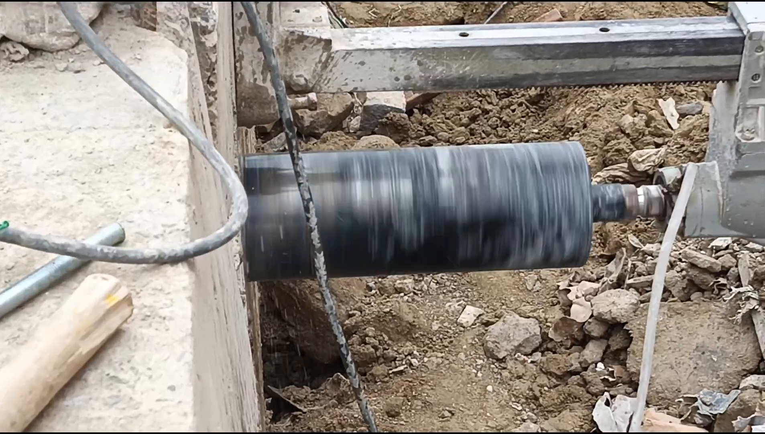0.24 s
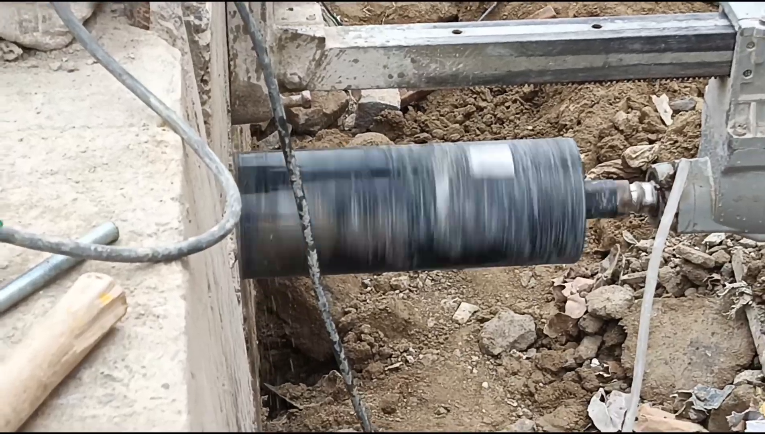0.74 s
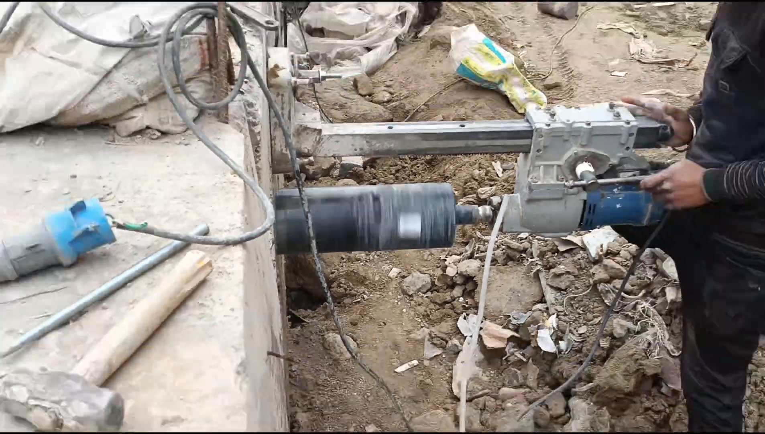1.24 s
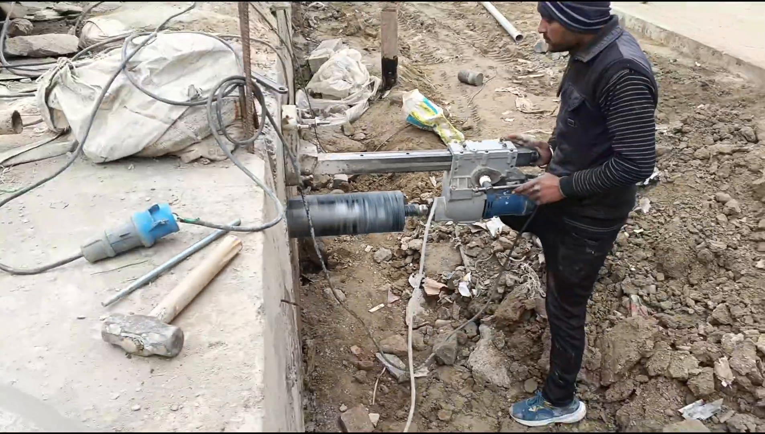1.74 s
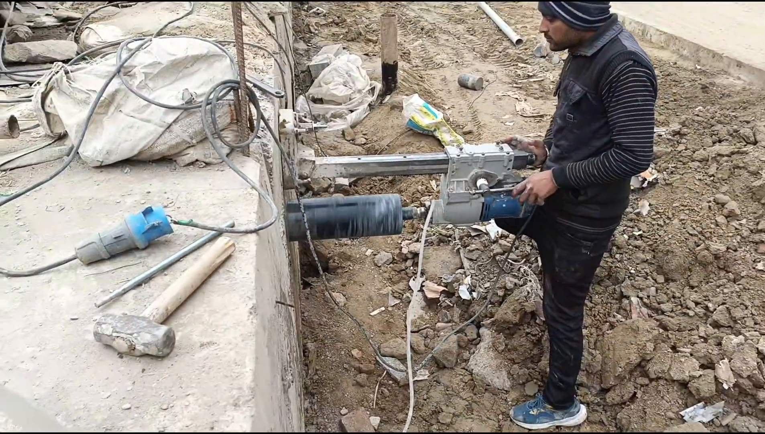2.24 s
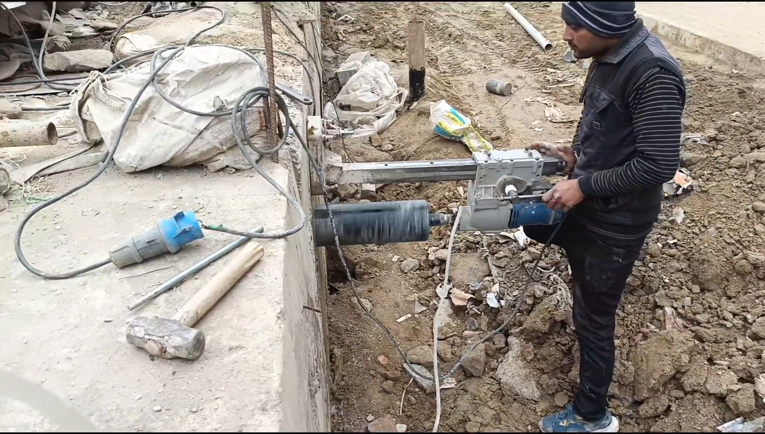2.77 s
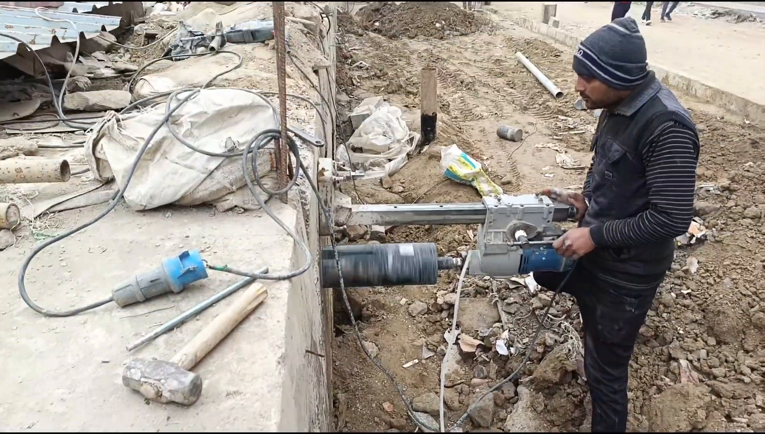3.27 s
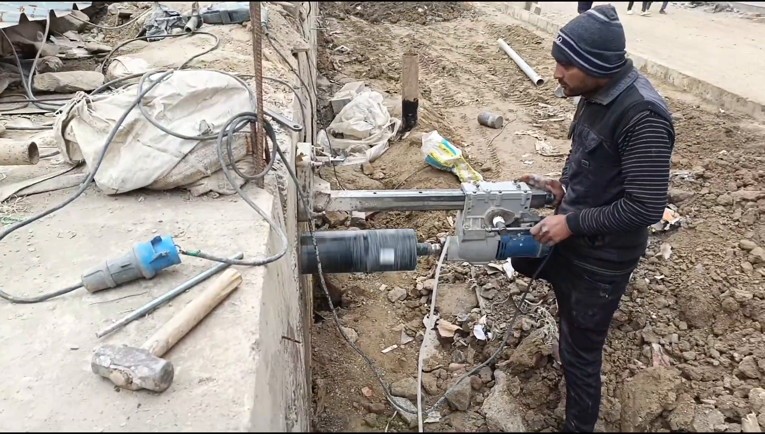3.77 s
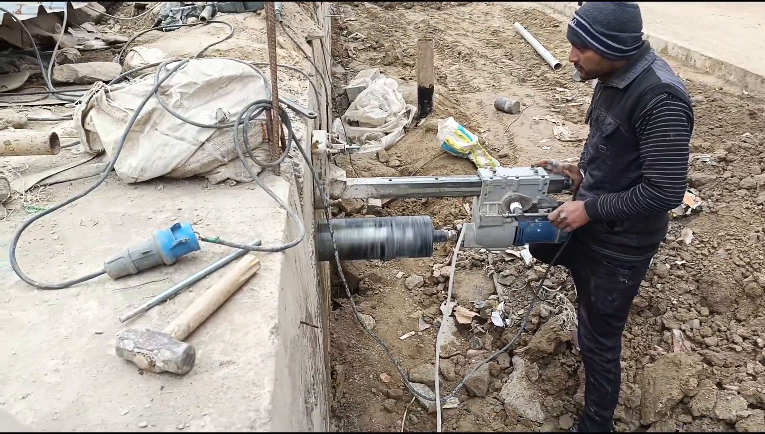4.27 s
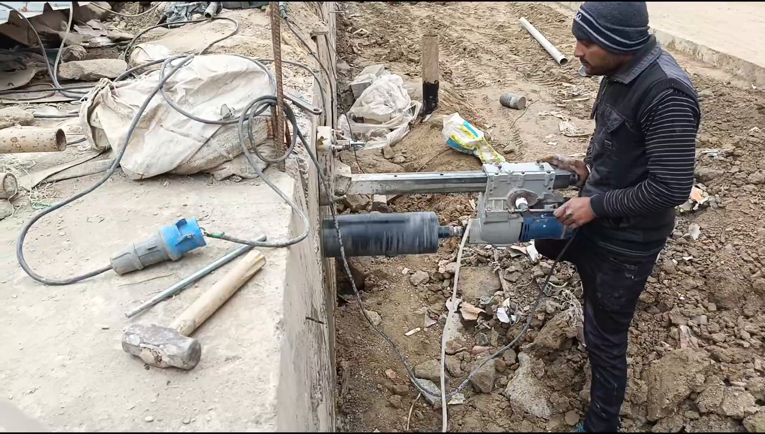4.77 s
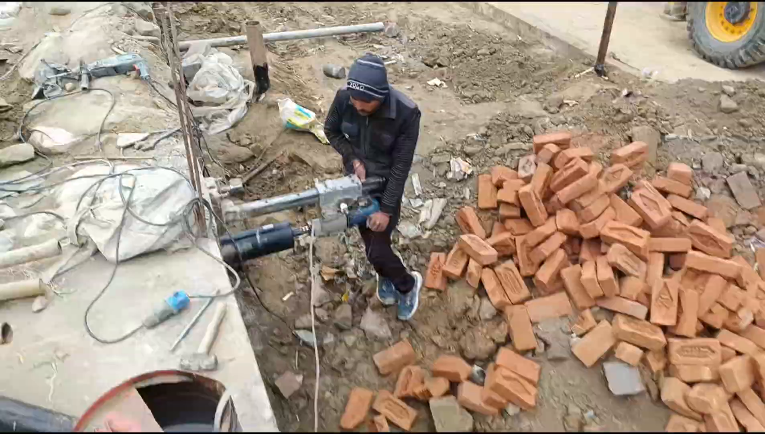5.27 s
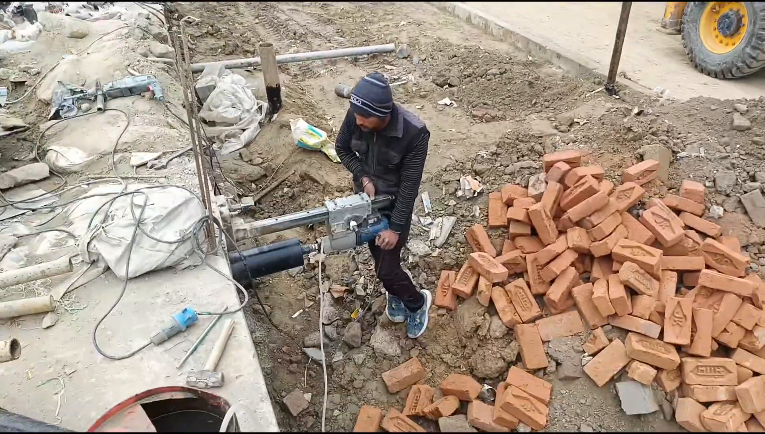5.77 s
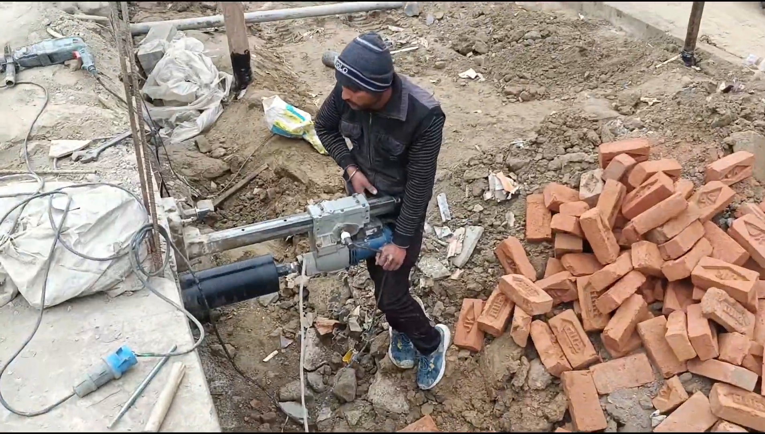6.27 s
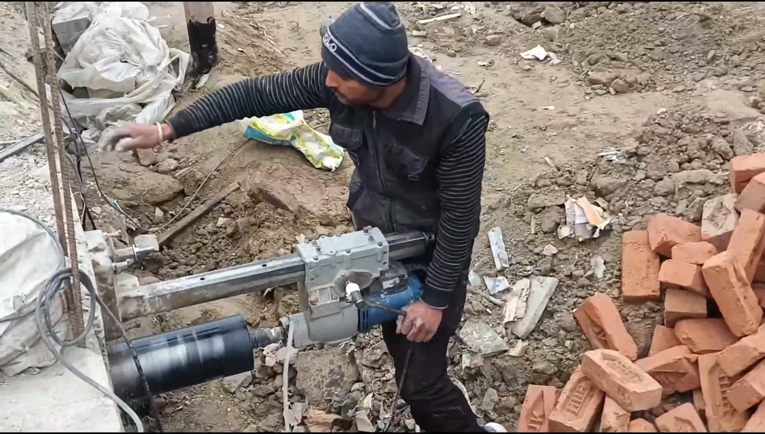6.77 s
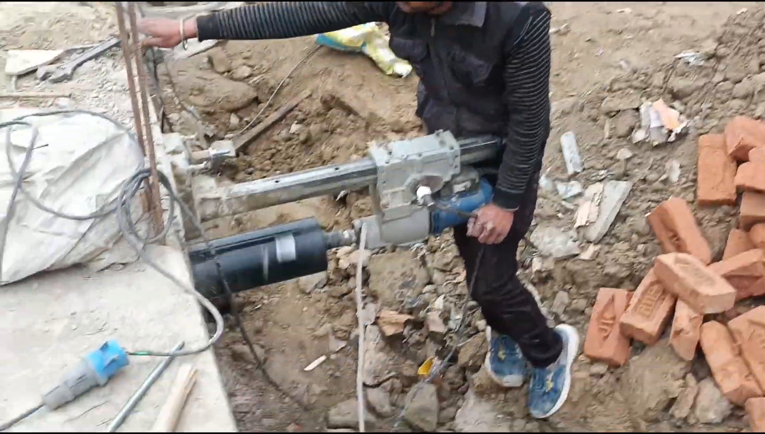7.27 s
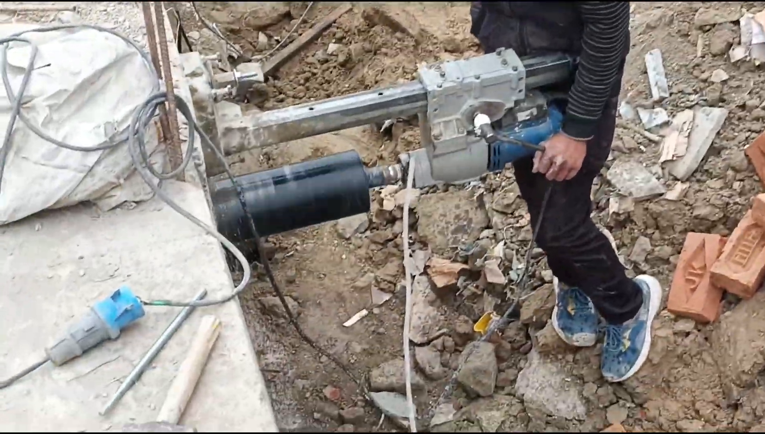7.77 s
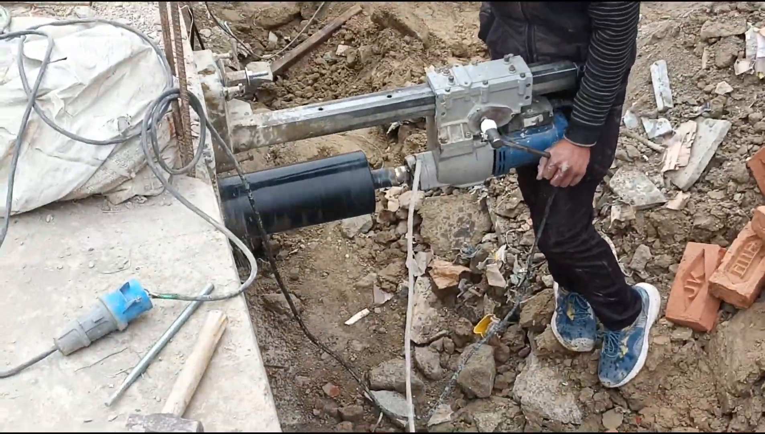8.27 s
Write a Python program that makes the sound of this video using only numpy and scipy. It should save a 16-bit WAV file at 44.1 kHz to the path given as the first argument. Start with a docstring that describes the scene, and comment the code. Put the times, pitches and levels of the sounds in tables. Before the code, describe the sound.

A core drill cuts concrete outdoors, hissing, whining and knocking, then after a brief gap labours lower beside a revving diesel engine.

```python
"""An electric core drill grinds into a concrete wall outdoors. Diamond grit makes its steel barrel
ring, the barrel knocks as it catches in the cut, and the gears whine.
The drill is heard at the wall, then from the side. After a short silence it fades in from above,
running slower under more load, while a diesel engine revs nearby."""
import sys
import numpy as np
from scipy import signal
from scipy.fft import rfft, irfft, next_fast_len
from scipy.io import wavfile

SR = 44100
rng = np.random.default_rng(int(sys.argv[2]) if len(sys.argv) > 2 else 0)


def master_out(mix):
    """Clip the mix to full scale and print it as 16-bit PCM to the path in sys.argv[1]."""
    frames = np.transpose(np.atleast_2d(mix))
    ceiling = np.clip(frames, -1, 1)
    pcm = np.round(ceiling * 32767).astype(np.int16)
    wavfile.write(sys.argv[1], SR, pcm)


N = 376160
TIME = np.arange(N) / SR
FFT_SIZE = next_fast_len(N, True)
BIN_HZ = np.maximum(np.arange(FFT_SIZE // 2 + 1) * SR / FFT_SIZE, 1)
SILENCE_FROM_S, SILENCE_TO_S = 5.272, 5.335
HEAVY_LOAD = TIME > SILENCE_FROM_S


def from_db(db):
    """Turn decibels into a number to multiply by."""
    return 10 ** (np.asarray(db) / 20)


def rms(x):
    """The average strength of a signal (root mean square)."""
    return np.sqrt(np.mean(x ** 2) + 1e-20)


def curves(rows):
    """Join timed points with straight lines, one curve for each column after the time."""
    times_s, *columns = np.transpose(rows)
    return [np.interp(TIME, times_s, column) for column in columns]


def bell(peak_s, width_s):
    """A smooth bump of height 1, down to 0.61 at width_s either side of its peak."""
    return np.exp(-((TIME - peak_s) / width_s) ** 2 / 2)


def swells(rows):
    """Add up smooth rises and dips, in decibels."""
    return sum(db * bell(peak_s, width_s) for peak_s, width_s, db in rows)


def butter(x, hz, kind, order=4):
    """Keep the lows, the highs or one band of a sound."""
    return signal.sosfilt(signal.butter(order, hz, kind, fs=SR, output="sos"), x)


def drift(changes_per_s):
    """A smooth random wobble with a typical size of 1."""
    step, warm_up = 40, 2000
    pole = np.exp(-2 * np.pi * step * changes_per_s / SR)
    noise = rng.standard_normal(N // step + warm_up + 2)
    slow = signal.lfilter([1], [1, -2 * pole, pole * pole], noise)[warm_up:]
    return np.interp(np.arange(N) / step, np.arange(len(slow)), slow / rms(slow))


def angle_of(hz):
    """How far something has turned when it spins hz times a second."""
    return 2 * np.pi * np.cumsum(hz) / SR


# How the engine revs. Columns: time_s, pitch_hz, level_db
ENGINE_REVS = [(5.38, 31.9, -37), (5.45, 33, -29), (5.88, 40.6, -28), (6.27, 41.7, -31.5),
               (6.47, 39.7, -30.5), (6.6, 35.1, -38), (6.68, 37.47, -22.5), (6.99, 44, -26.5),
               (7.34, 46.2, -23), (8.5, 46.2, -37.5)]
# The pitches its exhaust favours or holds back. Columns: pitch_hz, gain_db
EXHAUST_TONE = [(46, -21.5), (64, -8), (73, 8), (82, -9.5), (93, 3.5), (112, 5), (123, -12), (141, -6.5),
                (163, -0.5), (185, -9.5), (280, -18)]

def diesel(harmonics=6, uneven_db=1.5, roughness=0.21, trim_db=-1.0):
    """An engine revs, sags and revs again, firing unevenly; its exhaust boosts some of its harmonics."""
    pitch_hz, level_db = curves(ENGINE_REVS)
    angle = angle_of(pitch_hz * (1 + 0.0032 * drift(5.9)))
    exhaust_hz, exhaust_db = np.transpose(EXHAUST_TONE)
    multiples = np.arange(1, harmonics + 1)
    gains = from_db(np.interp(np.log(np.outer(multiples, pitch_hz)), np.log(exhaust_hz), exhaust_db))
    gains /= np.linalg.norm(gains, axis=0)
    hum = np.zeros(N)
    for multiple, gain in zip(multiples, gains):
        uneven = from_db(uneven_db * drift(7.5))
        hum += gain * uneven * np.sin(multiple * angle + rng.uniform(0, 2 * np.pi))
    return np.sqrt(2) * from_db(level_db + trim_db) * hum * (1 + roughness * drift(25))


# The tone of the meshing gear teeth swells. Columns: peak_s, width_s, change_db
MESH_SWELLS = [(6.1, 0.068, 6), (8.02, 0.083, 8)]
# The high whine dips briefly, and once rises. Columns: peak_s, width_s, change_db
WHINE_CHANGES = [(0.17, .13, -20), (0.95, .12, 3), (1.8, .14, -9), (2.2, 0.057, -13), (2.47, .04, -9),
                 (3.38, .15, -11), (3.75, .05, -15), (4.35, .1, -5), (5.9, 0.35, -22), (8.45, .2, -12)]

def gears(mesh_hz, mesh_db, whine_db, rattle=0.35, housing_hz=997.4, housing_width_hz=57):
    """Gear teeth sing as they meet, roughened by the slack between them, with a thin whine far above."""
    drag = np.where(HEAVY_LOAD, 0.0018, 0.00039) * drift(9.4)  # the speed wavers as the bit drags
    jitter = 0.00056 * drift(60)
    angle = angle_of(mesh_hz * (1 + drag + jitter))
    mesh = (1 + rattle * drift(22)) * np.sin(angle) + rattle * drift(22) * np.cos(angle)
    # Under heavy load the tone is loudest at the pitch where the gear housing rings.
    housing = 1 / (1 + (2 * (mesh_hz - housing_hz) / housing_width_hz) ** 2)
    mesh *= np.where(HEAVY_LOAD, housing, 1) * from_db(mesh_db + swells(MESH_SWELLS))
    flutter_db = 1.5 * drift(120) + 2.0 * drift(9.4)
    whine = np.sin(11 * angle) * from_db(whine_db + flutter_db + swells(WHINE_CHANGES))
    return np.sqrt(2) * (mesh + whine)


def grit(grains_per_s):
    """Diamond grains chip the concrete in a dense hail of tiny hits."""
    return (rng.random(N) < grains_per_s / SR) * rng.standard_normal(N)


def resonate(x, pitch_hz, width_hz, boost_db):
    """Pass a sound through resonances; each boosts one narrow band, or cuts it if negative."""
    pole = np.exp(-np.pi * width_hz / SR)
    tuning = -2 * pole * np.cos(2 * np.pi * pitch_hz / SR)
    boost = (from_db(boost_db) - 1) * (1 - pole ** 2) / 2
    filters = [1 + boost, tuning, pole ** 2 - boost, np.ones_like(pole), tuning, pole ** 2]
    return signal.sosfilt(np.column_stack(filters), x)


# The balance of bass and treble at each listening place. Columns: pitch_hz, wall_db, side_db, above_db
TONE_BALANCE = [(50, -77, -79, -70), (100, -67, -80, -59), (187, -69, -71, -52), (299, -71, -79, -60.5),
                (710, -62, -64.5, -62), (1540, -56.5, -55, -56), (3480, -57.5, -57.5, -56),
                (3900, -53, -63, -58.5), (6310, -51, -48, -53), (7245, -58.5, -60.5, -61),
                (8040, -76, -83.5, -70.5), (11150, -83.5, -87.5, -91), (13500, -78, -94, -85),
                (15400, -67.5, -83, -75)]
# The pitches at which barrel and stand ring, and the boost heard at each place.
# Columns: pitch_hz, width_hz, wall_db, side_db, above_db
RESONANCES = [(200, 45, 14, 16, 0), (242, 45, 2, 1, 6), (400, 70, 12.5, 17, -3), (528, 50, 5, 8, 11),
              (884, 78, 6, 8, 3), (975, 55, 3, 5, 8), (1160, 44, 12, 8, 0), (1403, 33, 6, 7, 0),
              (1655, 42, 10, 6, 4), (1787, 44, 0, 0, 5), (1882, 56, 4, 5, 0), (2035, 118, 7, 2, 4),
              (2208, 64, 0, 1, 5), (2407, 61, 2, 0, 6), (2577, 20, 11, 11.5, 1), (2648, 24, 10, 10, 4),
              (2831, 89, 6, 10, -2), (3400, 400, -1.5, -3.5, 0), (3759, 26, 8, 8, 4), (3848, 15, 10, 11, 2),
              (3969, 260, 0, 12, 9), (4499, 390, 7, 9, 0), (5167, 29, 10, 10, 6), (5268, 23, 7, 8, 6),
              (5525, 179, 9, 7, 2), (5937, 32, 6, 6, 2), (6773, 27, 6, 5, 3), (6889, 21, 11, 11, 5),
              (7178, 17, 7, 0, 0), (9150, 400, 6, 4, 0)]

def barrel_and_stand(force, place):
    """A force rings the barrel and stand, heard at the wall (place 0), the side (1) or above (2)."""
    balance_hz, *balance_db = np.transpose(TONE_BALANCE)
    pitch_hz, width_hz, *boost_db = np.transpose(RESONANCES)
    gain = from_db(np.interp(np.log(BIN_HZ), np.log(balance_hz), balance_db[place]))
    shaped = irfft(rfft(force, FFT_SIZE) * gain, FFT_SIZE)[:N]
    ringing = resonate(shaped, pitch_hz, width_hz, boost_db[place])
    return butter(ringing, 55, "high", order=2)


# Moments when one pitch of the barrel rings out. Columns: peak_s, width_s, pitch_hz, level_db
RIM_RUBS = [(0.38, .18, 1162, -31), (0.51, .08, 5480, -20.5), (1.24, .05, 3830, -25), (1.4, .17, 2610, -29),
            (1.48, .07, 1162, -29), (1.85, .22, 2840, -32.5), (2.15, .15, 2610, -26.5),
            (3.35, .13, 3860, -26), (4.45, .06, 2620, -29), (6.52, .06, 5200, -25.5),
            (6.74, .05, 2640, -29.5), (7.4, .2, 2215, -31.5)]

def rim_rubs(half_band=0.015):
    """Now and then the rim rubs, and the barrel sings in a narrow band around one pitch."""
    sound = np.zeros(N)
    for peak_s, width_s, pitch_hz, level_db in RIM_RUBS:
        band_hz = [pitch_hz * (1 - half_band), pitch_hz * (1 + half_band)]
        ring = butter(grit(grains_per_s=11000), band_hz, "band", order=2)
        sound += from_db(level_db) * bell(peak_s, width_s) * ring / rms(ring)
    return sound


# Moments when the barrel catches in the cut. Columns: peak_s, level_db
CATCHES = [(0.648, -27), (0.931, -25), (1.128, -27.5), (1.578, -30), (1.723, -30.5), (1.8, -28.5),
           (1.95, -28.5), (2.005, -29), (2.196, -25.5), (2.45, -30), (2.654, -27.5), (2.786, -21),
           (3.026, -26), (3.543, -37), (3.698, -25.5), (3.935, -34), (4.02, -31), (4.071, -29),
           (4.196, -30), (4.329, -26), (4.482, -24.5), (4.641, -30), (5.144, -26), (5.264, -26.5)]

def knocks(width_s=0.011, dull_hz=600, scrape_db=-16, body_hz=(150, 600), trim_db=-0.5):
    """Each catch is a short, dull scrape that shakes the stand at its low pitches."""
    bursts = sum(from_db(level_db) * bell(peak_s, width_s) for peak_s, level_db in CATCHES)
    scrape = grit(grains_per_s=12000)
    force = butter(scrape, dull_hz, "low", order=2) + from_db(scrape_db) * scrape
    shake = barrel_and_stand(force, place=1)
    return from_db(trim_db) * bursts * shake / rms(butter(shake, body_hz, "band"))


def drifting_echo(force, echo=0.2, delay_s=0.003, wander_s=0.00021):
    """A faint, very short echo with a drifting delay slowly shifts the colour of the grinding."""
    delay = (delay_s + wander_s * drift(1.21)) * SR
    return force + echo * np.interp(np.arange(N) - delay, np.arange(N), force)


def steel_overtones(force, count=30, width_hz=70):
    """The steel tube also rings faintly at many pitches scattered through the high treble."""
    pitch_hz, boost_db = rng.uniform([7300, 0.5], [10600, 1.5], (count, 2)).T
    return resonate(force, pitch_hz, np.full(count, width_hz), boost_db)


def place_shares(move_from_s=3.01, move_to_s=3.33):
    """How much is heard from each place: first the wall, then the side, then above."""
    above = TIME > SILENCE_FROM_S
    aside = np.clip((TIME - move_from_s) / (move_to_s - move_from_s), 0, 1)
    return np.array([(1 - aside) * ~above, aside * ~above, above])


# The bands that set the strength of growl, low hiss, high hiss and spray. Columns: low_hz, high_hz
LEVEL_BANDS = [(1250, 3300), (3300, 4900), (4900, 7500), (8000, 10800)]

def split_bands(sound, edges_hz=(700, 3300, 4900, 7700), hiss_hz=(3300, 7500)):
    """Split a sound, low to high, into rumble, growl, low hiss, high hiss and spray, and scale each."""
    spectrum = rfft(sound, FFT_SIZE)
    below = [irfft(spectrum / (1 + (BIN_HZ / hz) ** 24), FFT_SIZE)[:N] for hz in edges_hz]
    bands = np.diff([np.zeros(N), *below, sound], axis=0)
    levels = [rms(irfft(spectrum * (BIN_HZ > low_hz) * (BIN_HZ < high_hz), FFT_SIZE))
              for low_hz, high_hz in [hiss_hz, *LEVEL_BANDS]]  # the rumble is scaled by the hiss
    return bands / np.array(levels)[:, None]


# The push on the drill surges or eases. Columns: peak_s, width_s, change_db
PUSHES = [(0.5, 0.13, 1.1), (1.26, 0.096, 0.7), (3.58, 0.065, 2), (4.12, 0.09, 1.6), (5.02, 0.086, 1.5),
          (7.2, 0.2, -1.7), (7.84, 0.051, -0.9), (8.5, 0.088, -1)]
# How hard the bit bites, bringing up rumble, growl and spray. Columns: time_s, bite_db
BITE = [(0.6, -1.5), (1.45, 1), (2.65, 0.4), (2.95, -1), (3.5, -1.5), (4.15, 0.9), (5.6, 0), (6.2, -2.5),
        (6.7, 0.2), (7.35, 1.8), (7.9, -1.5)]
# The strength of the low hiss next to the high hiss. Columns: time_s, low_hiss_db
HISS_BALANCE = [(0, -1), (0.5, -3), (1.9, 0.5), (2.8, -1), (3.55, 2), (4.15, -3), (6.7, -1.9), (8.0, -4)]

def grinding(mesh_hz, hiss_db, growl_db, spray_db, meshes_per_turn=157):
    """Grit rings the barrel; the pressure surges with each push, swings with each turn and judders."""
    bite_db, = curves(BITE)
    low_gain = from_db(curves(HISS_BALANCE)[0])
    force = steel_overtones(drifting_echo(grit(grains_per_s=36000)))
    rumble, growl, low_hiss, high_hiss, spray = sum(
        share * split_bands(barrel_and_stand(force, place)) for place, share in enumerate(place_shares()))
    turn = np.sin(angle_of(mesh_hz / meshes_per_turn) + drift(0.46))
    jerks = butter(drift(15), 3.24, "high", order=2)
    judder = np.minimum(jerks, 1.3)  # the motor gives way, so upward jerks level off
    pressure_db = swells(PUSHES) + 0.5 * turn + 1.08 * judder + 0.47 * drift(5.1)
    hiss = (low_gain * low_hiss + high_hiss) / np.hypot(low_gain, 1)
    rumble *= from_db(-1.37 + 0.9 * bite_db + (turn + judder) / 2)  # the heavy stand feels swings most
    growl *= from_db(growl_db + bite_db)
    spray *= from_db(spray_db + np.where(HEAVY_LOAD, 2.1, 0.36) * bite_db)
    return from_db(hiss_db + pressure_db) * (rumble + growl + hiss + spray)


# How often the gear teeth meet, under light and under heavy load. Columns: time_s, mesh_hz
LIGHT_LOAD_SPEED = [(0.4, 1218), (0.7, 1210), (0.8, 1195), (1.29, 1180), (2.0, 1168), (2.7, 1191),
                    (4.25, 1187), (4.55, 1179), (5.25, 1175)]
HEAVY_LOAD_SPEED = [(5.42, 993), (5.9, 984), (6.3, 999), (6.9, 1022), (7.3, 1025), (8.18, 1007),
                    (8.47, 993)]
# The drill's mix, one row each for wall, side and above.
# Columns: hiss_db, growl_over_hiss_db, spray_over_hiss_db, mesh_db, whine_db
MIX_BY_PLACE = [(-15.0, -9.5, -18.5, -51, -34), (-15, -10, -22, -43, -38), (-17, -3.5, -21.5, -30, -53.5)]
# The grinding swells back after the silence. Columns: time_s, gain_db
FADE_IN = [(5.335, -19.5), (5.39, -7.5), (5.45, -6), (5.53, 0)]

def scene(engine_rise_s=0.026):
    """Drill and engine in the open air, the same in both channels."""
    mesh_hz = np.where(HEAVY_LOAD, curves(HEAVY_LOAD_SPEED)[0], curves(LIGHT_LOAD_SPEED)[0])
    hiss_db, growl_db, spray_db, mesh_db, whine_db = np.transpose(MIX_BY_PLACE) @ place_shares()
    fade = np.where(TIME > SILENCE_FROM_S, from_db(curves(FADE_IN)[0]), 1)
    cutting = fade * grinding(mesh_hz, hiss_db, growl_db, spray_db) + knocks() + rim_rubs()
    # Gears and engine fade in sooner than the grinding.
    engine_fade = np.clip((TIME - SILENCE_TO_S) / engine_rise_s, 0, 1)
    sound = cutting + np.sqrt(fade) * gears(mesh_hz, mesh_db, whine_db) + engine_fade * diesel()
    return np.array([sound, sound])


def record(dry, silence_db=-56, ceiling=0.82, cutoff_hz=15600):
    """The sound drops out briefly, its peaks are rounded and the highest treble is cut."""
    silent = (TIME > SILENCE_FROM_S) & (TIME < SILENCE_TO_S)
    gate = np.where(silent, from_db(silence_db), 1)
    rounded = dry / (1 + (dry / ceiling) ** 6) ** (1 / 6)
    treble_cut = signal.ellip(12, 0.1, 90, cutoff_hz, fs=SR, output="sos")
    return signal.sosfilt(treble_cut, gate * rounded)


dry = scene()
out = record(dry)
master_out(out)
```